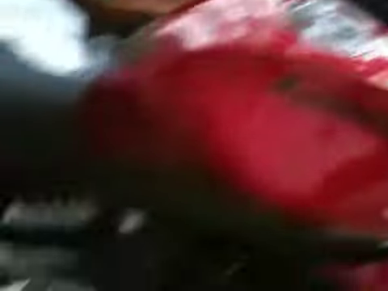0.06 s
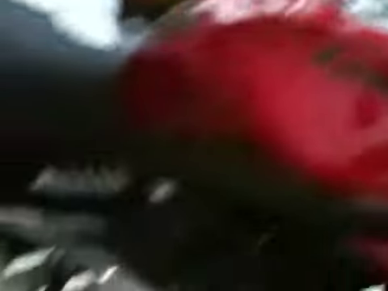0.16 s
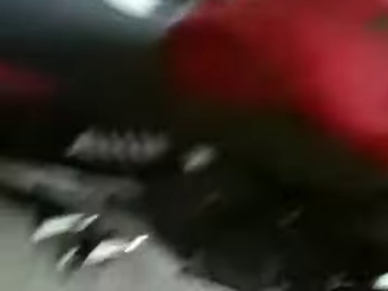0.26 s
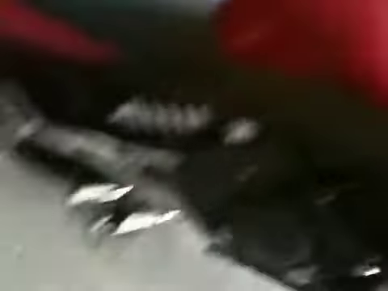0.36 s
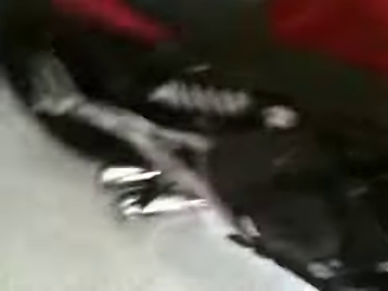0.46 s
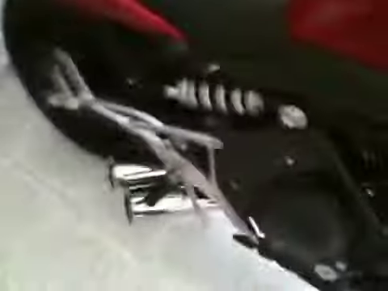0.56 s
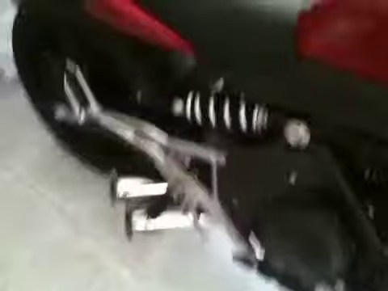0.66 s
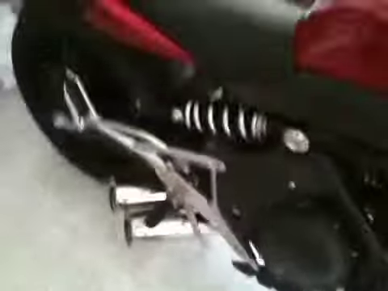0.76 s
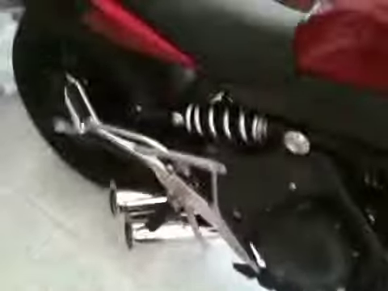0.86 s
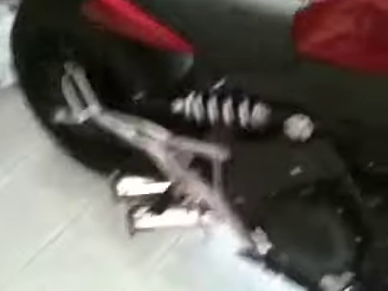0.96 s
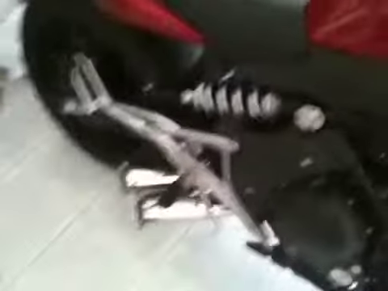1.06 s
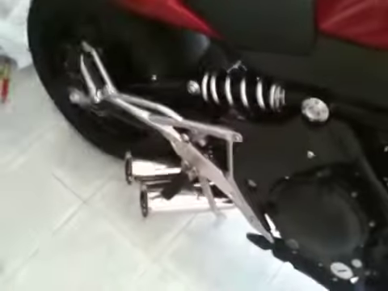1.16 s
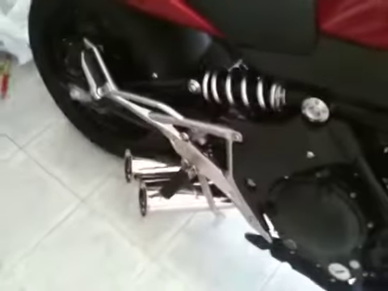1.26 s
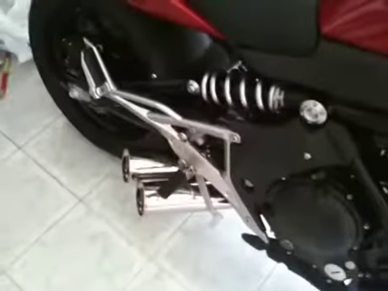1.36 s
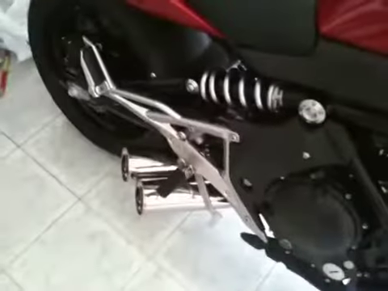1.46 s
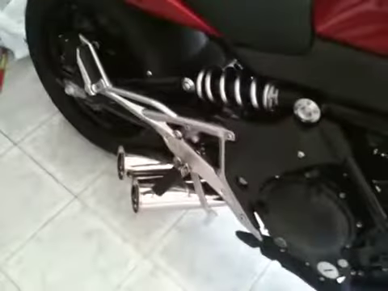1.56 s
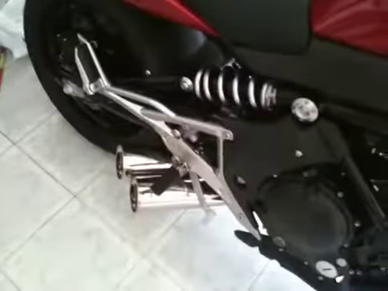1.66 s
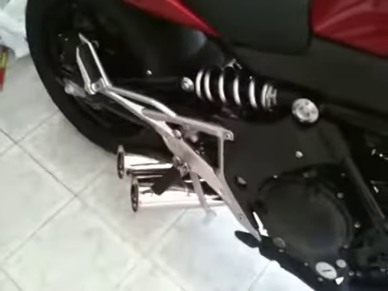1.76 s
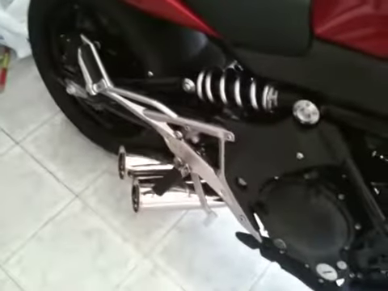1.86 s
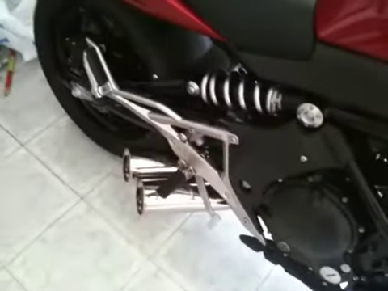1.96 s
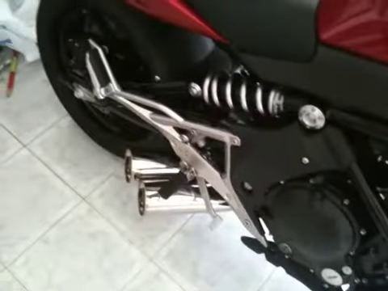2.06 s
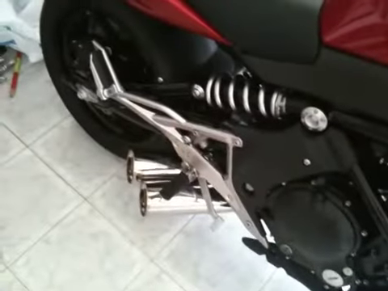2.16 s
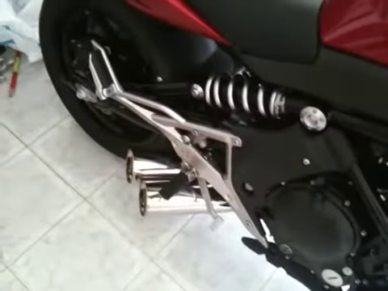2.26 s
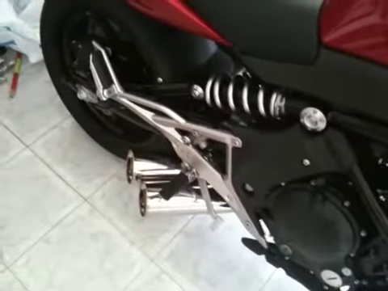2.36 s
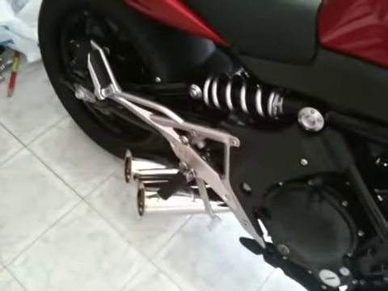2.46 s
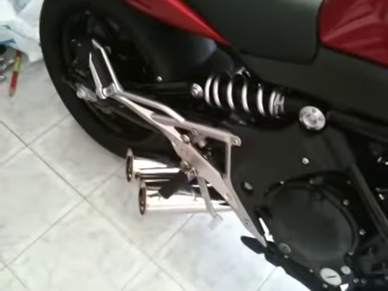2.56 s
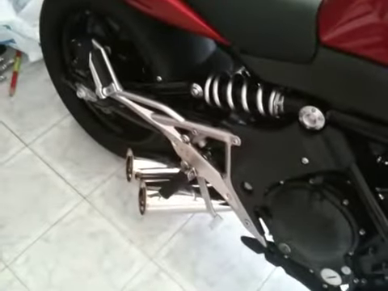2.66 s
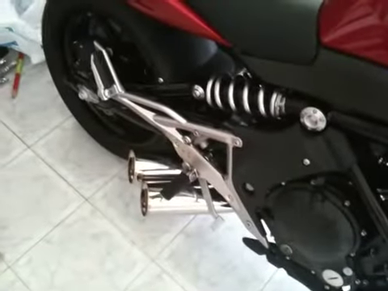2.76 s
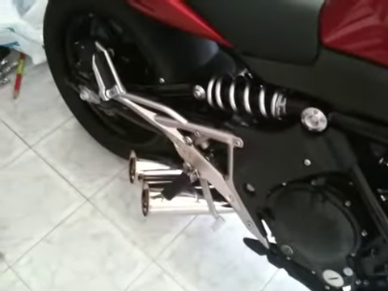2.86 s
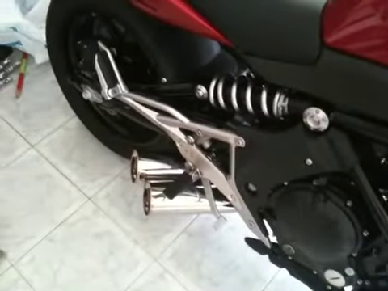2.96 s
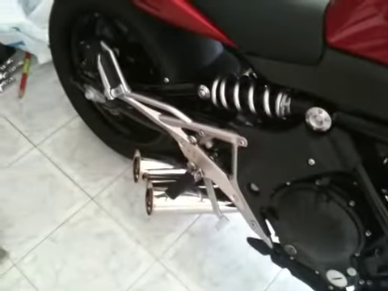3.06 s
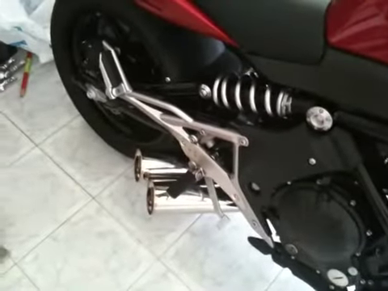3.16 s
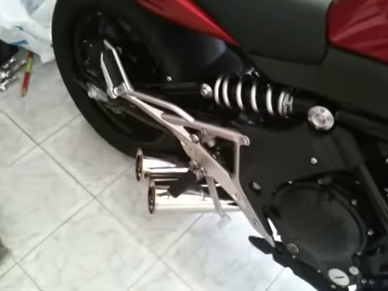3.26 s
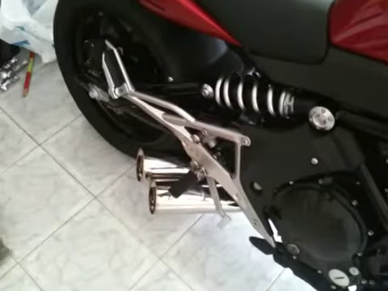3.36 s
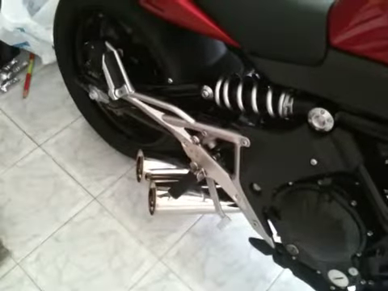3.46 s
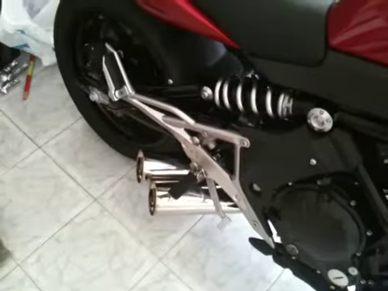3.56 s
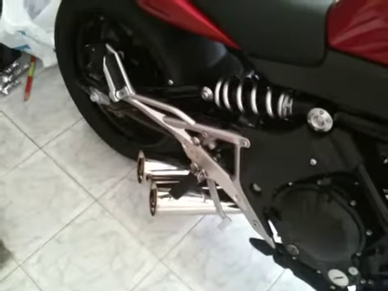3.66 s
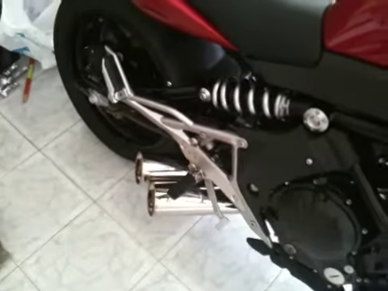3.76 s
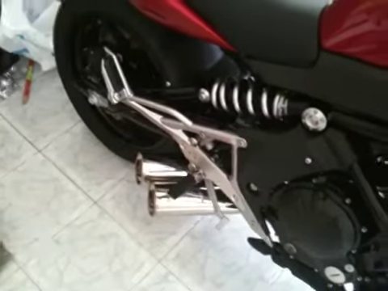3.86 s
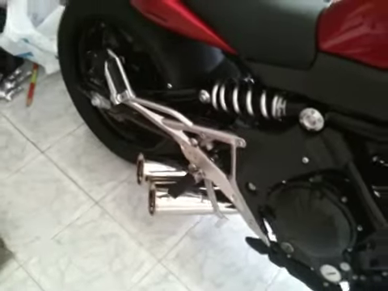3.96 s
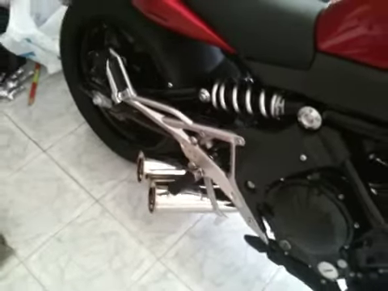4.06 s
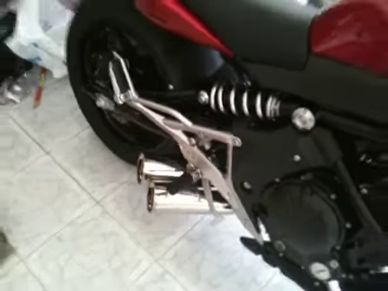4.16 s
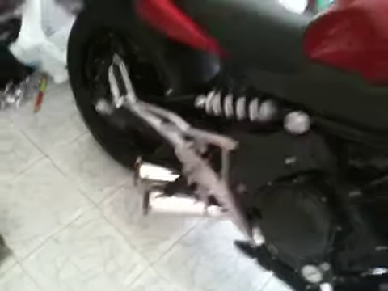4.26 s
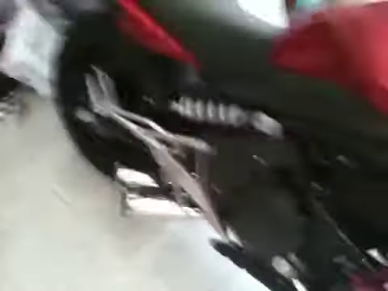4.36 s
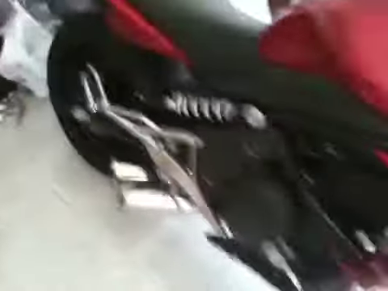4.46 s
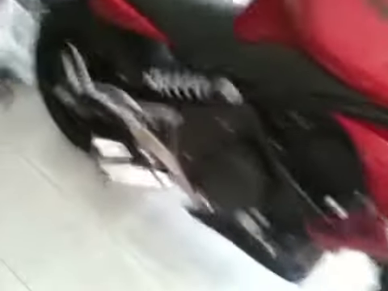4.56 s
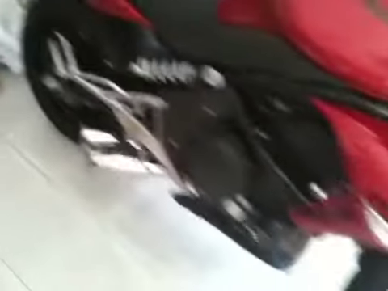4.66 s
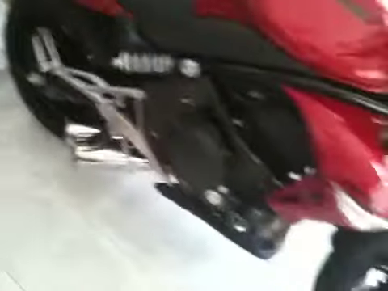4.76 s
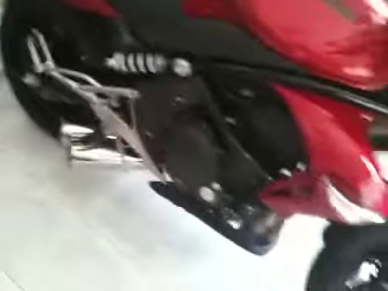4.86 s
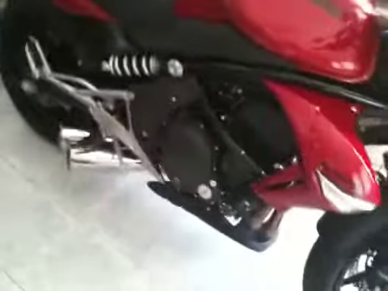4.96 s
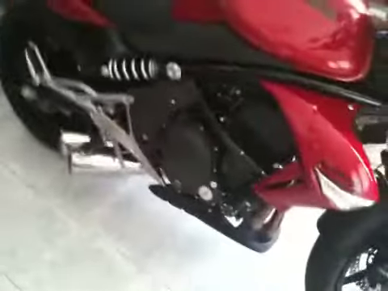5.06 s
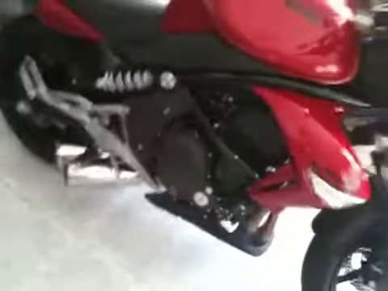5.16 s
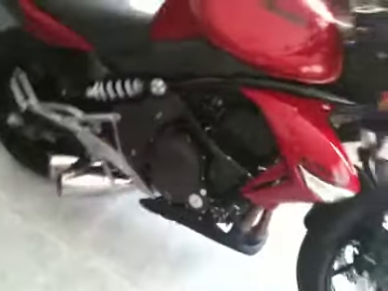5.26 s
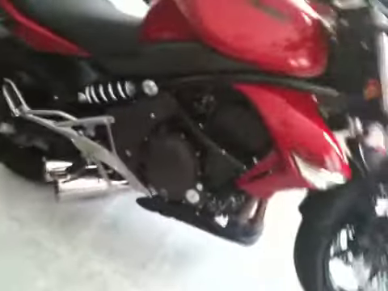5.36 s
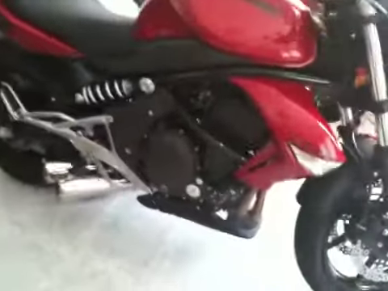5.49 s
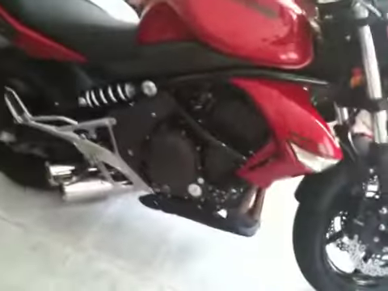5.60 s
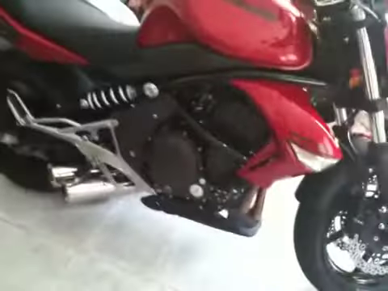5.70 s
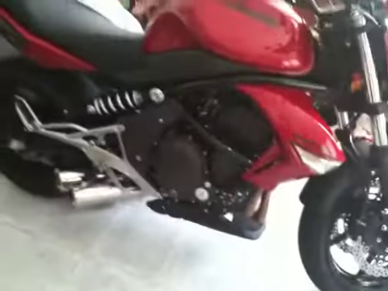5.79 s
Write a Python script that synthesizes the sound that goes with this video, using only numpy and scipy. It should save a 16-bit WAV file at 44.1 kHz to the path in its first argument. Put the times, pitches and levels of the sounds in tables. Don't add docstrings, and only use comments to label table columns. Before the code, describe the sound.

In a small tiled room, soles shuffle very quietly with small taps, a faint key ring and rubber squeaks for two seconds. A starter then clacks, grinds and squeals for about half a second. The two-cylinder motorcycle catches unevenly and idles loudly, its throbbing exhaust overloading the close microphone, which shifts place partway through.

```python
import sys
import numpy as np
from scipy import signal
from scipy.fft import rfft, irfft, next_fast_len
from scipy.io import wavfile
from scipy.ndimage import uniform_filter1d

SR = 44100
rng = np.random.default_rng(int(sys.argv[2]) if len(sys.argv) > 2 else 0)


def volts_from_db(level):
    exponent = np.asarray(level, float) / 20
    return 10 ** exponent


def output_pcm(signal):
    pcm = np.clip(np.atleast_2d(signal).T, -1, 1) * 32767
    wavfile.write(sys.argv[1], SR, np.round(pcm).astype(np.int16))


N = 257103

# (start [s], end [s])
MIC_MOVE = (3.95, 4.72)
# (time [s], strength [dB])
CATCHING = [(2.344, -0.5), (2.367, 6), (2.453, -1), (2.474, -11), (2.556, -10), (2.577, -20), (2.635, 1.5),
            (2.658, 0), (2.675, -1), (2.726, 5.5), (2.746, -0.5), (2.808, 2.5), (2.828, 3.5), (2.885, 4),
            (2.902, 4.5)]


def firings():
    cycle = np.arange(idle_cycles())
    second_lag = .241
    pair = np.c_[cycle, cycle + second_lag].ravel()
    at = crank(pair)
    chance = rng.standard_normal((len(pair), 3))
    second = np.arange(len(pair)) % 2
    blow_db = 1.93 + 2.3 * second + 1.0 * chance[:, 0]
    crack_db = np.interp(at, MIC_MOVE, (0.3, 2)) - 5.9 * second + 0.9 * chance[:, 1]
    catch_s, catch_db = np.transpose(CATCHING)
    all_s = np.r_[catch_s, at + .00025 * chance[:, 2]]
    return all_s, np.r_[catch_db, blow_db], np.r_[catch_db - 3.0, crack_db]


IDLE_START_S = 2.9568
IDLE_SPEED = [(2, 1647.2), (2, 1696.1), (2, 1658.6), (2, 1704.5), (2, 1744.2), (4, 1729.1), (2, 1750.5),
              (8, 1766.0), (8, 1774.5), (6, 1697.3), (4, 1750.5)]


def crank(cycles):
    held, rpm = np.transpose(IDLE_SPEED)
    cycles_done = np.r_[0, np.cumsum(held)]
    seconds_gone = np.r_[0, np.cumsum(held * 2 * 60 / rpm)]
    return IDLE_START_S + np.interp(cycles, cycles_done, seconds_gone)


def idle_cycles():
    return sum(held for held, _ in IDLE_SPEED)


# (pitch [Hz], width [Hz], pressure at the first mic place [1/1000], at the second [1/1000])
ROOM_NOTES = [(114.2, 10.1, 332, 219), (145.76, 7.2, 524, 587), (173.33, 7.8, 412, 293),
              (186.3, 5.8, 345, 165.9), (215.46, 1.73, 230, 245), (242.35, 6.5, 280, 364),
              (249.56, 7.1, 23, 411), (275, 10.7, 537, -56.5), (301.3, 3.04, -132.9, -71),
              (325.1, 2.9, -150.5, -117), (361.8, 7.6, 274, 149), (411.6, 4.15, -52, -76),
              (471.4, 3.4, -30, -24), (483.6, 8.7, -11, 47), (556, 4.1, 26, -23), (605, 3.6, 26, -41),
              (676, 120, -185.6, -53)]


def exhaust(s, blow_db):
    u = np.arange(400) / SR / 0.00043
    blow = (1 - u) * np.exp(-u) / (.0005 * SR)
    t = np.arange(SR // 2) / SR
    hz, width, *places = np.transpose(ROOM_NOTES)
    fading = np.exp(-np.pi * np.outer(t, 1.03 * width))
    rings = fading * np.sin(2 * np.pi * np.outer(t, hz))
    moved = np.clip((s - MIC_MOVE[0]) / (MIC_MOVE[1] - MIC_MOVE[0]), 0, 1)
    out = 4.2 * clicks(s, volts_from_db(blow_db))
    for share, pressure in zip((1 - moved, moved), places):
        train = clicks(s, share * volts_from_db(blow_db))
        out = out + signal.fftconvolve(train, rings @ pressure / 1000)[:N]
    out = signal.lfilter(*signal.butter(2, 1500, fs=SR), out)
    return signal.oaconvolve(out, blow)[:N]


# (time [s], pitch [Hz], level [dB])
PIPE_END = [
    (2.3, 592, -19),
    (2.9, 630, -14.5),
    (3.4, 618, -14.5),
    (3.75, 700, -13.5),
    (4.2, 790, -22),
    (5.0, 634, -38),
    (5.83, 624, -31),
]


def snaps(s, blow_db):
    _, hz, level_db = follow(PIPE_END)
    width = 75
    ring = resonate(clicks(s + .0008, volts_from_db(blow_db)), hz, width) * SR / (2 * np.pi * width)
    return -volts_from_db(level_db) * ring


# (time [s], peak level [dB])
EXTRA_POPS = [(2.368, -4.5), (2.7283, -15.5), (2.8087, -11), (2.9553, -27), (3.029, -13), (3.1724, -31),
              (3.3147, -35), (3.4585, -10), (3.5318, -9), (3.6691, -7), (3.8064, -42), (3.8748, -8.5),
              (4.6949, -10.5), (4.895, -13)]
# (pitch [Hz], width [Hz], level at the first mic place [dB], level at the second [dB])
PIPE_RINGS = [(1150, 85, 5.5, 2), (1555, 270, -8, 10.5), (2380, 150, 5, 16), (3500, 420, 1, -6)]
# (frequency [Hz], level per Hz [dB])
CRACK_COLOUR = [(260, 0), (450, 1.5), (993, -10), (1530, -13), (1950, -12), (2360, -18.5), (2660, -18),
                (4230, -31.5), (8800, -31.5), (15100, -41.5), (16000, -48)]


def cracks(s, crack_db):
    pop_s, pop_db = np.transpose(EXTRA_POPS)
    train = clicks(s + .0025, volts_from_db(crack_db)) + clicks(pop_s + 0.001068, volts_from_db(pop_db + 9.5))
    jet = volts_from_db(18.5) * train + puffs(train, 0.027)
    t = np.arange(N) / SR
    rings = np.zeros(N)
    for hz, width, *place_db in PIPE_RINGS:
        rings = rings + volts_from_db(np.interp(t, MIC_MOVE, place_db)) * resonate(jet, hz, width)
    echo = tiles(jet + 0.39 * rings, t60=0.31)
    echo = signal.lfilter(*signal.butter(1, 800, "high", fs=SR), echo)
    return volts_from_db(-24.5) * evened(colour(1.22 * jet + rings + volts_from_db(4.0) * echo, CRACK_COLOUR))


# (frequency [Hz], level per Hz [dB])
VALVE_COLOUR = [(260, -9), (450, -3.5), (979, -17), (1170, -14.5), (2400, -24), (4430, -28.5), (8930, -31),
                (11500, -37.5), (16000, -48)]
# (pitch [Hz], width [Hz], level at the first mic place [dB], level at the second [dB])
COVER_RING = (3340, 706, -23, -19)


def valve_gear(s, blow_db):
    effort = signal.lfilter([1], [1, -volts_from_db(-60 / 0.81 / SR)], clicks(s, volts_from_db(blow_db)))
    effort = abs(uniform_filter1d(effort, size=400) / np.median(effort[N // 2:])) ** 0.63
    count = np.arange(-60, 8 * idle_cycles())
    at = crank(count / 8) + np.minimum(count, 0) * .0105
    once_a_cycle = np.cos(2 * np.pi * (count / 8 - .08))
    tick_db = 4.3 * rng.standard_normal(len(at)) + 2.7 * once_a_cycle
    ticks = evened(puffs(clicks(at, volts_from_db(tick_db)), 0.038))
    ticks = signal.lfilter(*signal.butter(1, 9000, fs=SR), ticks)
    hiss = rng.standard_normal(N)
    gear = evened(colour(hiss + volts_from_db(-3.0) * ticks, VALVE_COLOUR))
    hz, width, *cover_db = COVER_RING
    cover_gain = volts_from_db(np.interp(np.arange(N) / SR, MIC_MOVE, cover_db))
    gear = gear + cover_gain * evened(resonate(gear, hz, width))
    return effort * volts_from_db(-30 + 8.0) * gear


# (time [s], rise [s], level [dB], fall [dB/s])
STARTER_LOADS = [
    (1.914, 0.013, -29.5, 60),
    (2.058, .008, -27.5, 140),
    (2.269, 0.011, -24, 124),
    (2.385, 0.0063, -33, 170),
]
# (frequency [Hz], level per Hz [dB])
GRIND_COLOUR = [(240, -15), (400, -15.5), (636, -10.5), (697, -3.5), (964, -9.5), (1420, -2), (1630, -5),
                (2020, -4), (5350, -11.5), (8370, -11), (16000, -25.5)]
# (pitch [Hz], width [Hz], level [dB])
CASING_RINGS = [(8200, 33, -17), (8558, 48, -15), (7100, 200, -28), (1140, 110, -10.5)]
# (time [s], rise [s], level [dB], fall [dB/s])
FRAME_SHAKE = (2.078, .025, -38.5, 42)
# (time [s], length [s], from pitch [Hz], to pitch [Hz], level [dB])
GEAR_SQUEALS = [
    (1.928, 0.084, 1150, 1480, -33.5),
    (2.065, .045, 1420, 950, -22.5),
    (2.269, 0.047, 1524, 1183, -24.5),
    (2.391, 0.057, 1640, 1513, -33),
]
# (time [s], length [s], from pitch [Hz], to pitch [Hz], level [dB])
GEAR_WHISTLE = (1.965, .06, 3700, 3630, -34)
# (time [s], level [dB], pitch [Hz], 60 dB fade [s])
SWITCH_CLACK = (1.9155, -25, 4750, .05)


def starter():
    on_s, off_s = 1.915, 2.49
    grind = swell(on_s, 0.0016, -37.5, 150, hold=off_s - on_s)
    grind = grind + sum(swell(*row) for row in STARTER_LOADS)
    teeth = evened(colour(rng.standard_normal(N), GRIND_COLOUR))
    strain = (grind / volts_from_db(-22.5)) ** .6
    casing = sum(volts_from_db(db) * evened(resonate(teeth, hz, width)) for hz, width, db in CASING_RINGS)
    teeth = teeth + strain * casing
    shake = evened(resonate(resonate(rng.standard_normal(N), 95, 80), 115, 94))
    out = grind * volts_from_db(-4.0) * teeth + swell(*FRAME_SHAKE) * shake
    for row in GEAR_SQUEALS:
        out = out + tone(glide(*row, in_db=2.5, out_db=-8.5), overtone_db=0.0, wobble=.04)
    out = out + tone(glide(*GEAR_WHISTLE, in_db=-15, out_db=-17), wobble=0.0056)
    s, level_db, hz, t60 = SWITCH_CLACK
    clack = puffs(clicks([s], [volts_from_db(level_db)]), t60)
    out = out + volts_from_db(-18) * signal.lfilter(*signal.butter(2, 9000, fs=SR), clack)
    out = out + volts_from_db(11.5) * resonate(clack, hz, 400)
    return out + volts_from_db(-6) * tiles(out)


# (time [s], rise [s], level [dB], share of the hollow ring [ratio])
SOLE_STEPS = [
    (.334, 0.066, -58, .27),
    (.615, 0.087, -56, 0.83),
    (1.035, 0.068, -57.5, .25),
    (1.215, .025, -62.5, .3),
    (1.57, 0.099, -52.5, 0.76),
    (1.69, 0.024, -57, 0.3),
]
# (frequency [Hz], level [dB])
SCRAPE_COLOUR = [(400, -9.5), (700, -5), (1200, -5.5), (1800, -6.5), (2400, -15), (4000, -27), (9000, -38)]


def shuffling():
    scrape = evened(colour(rng.standard_normal(N), SCRAPE_COLOUR))
    ring = evened(resonate(scrape, 850, 22))
    soles = swell(SOLE_STEPS[0][0], .05, -77.5, 0) * scrape
    for s, rise, db, hollow in SOLE_STEPS:
        soles = soles + swell(s, rise, db, fall=114) * (scrape + hollow * ring)
    return soles


# (time [s], peak level [dB], 60 dB fade [s])
SMALL_TAPS = [
    (0.3641, -42, 0.097),
    (0.384, -36, 0.1),
    (1.08, -37.5, 0.22),
    (1.2351, -46.5, 0.46),
    (1.702, -35.5, 0.1),
]


def tapping():
    taps = sum(puffs(clicks([s], [volts_from_db(db - 11.0)]), t60) for s, db, t60 in SMALL_TAPS)
    taps = signal.lfilter(*signal.butter(2, [1800, 8000], "band", fs=SR), taps)
    return taps + volts_from_db(8.0) * resonate(taps, 2660, 260)


# (pitch [Hz], level [dB])
KEY_NOTES = [(5082, -81), (6083, -85), (6982, -85)]


def key_ring():
    t = np.maximum(np.arange(N) / SR - .71, 0)
    fade_db = -60 * t / 0.99
    return sum(volts_from_db(db + 15.0 + fade_db) * np.sin(2 * np.pi * hz * t) for hz, db in KEY_NOTES)


# (time [s], length [s], from pitch [Hz], to pitch [Hz], level [dB])
RUBBER_SQUEAKS = [
    (.08, .12, 2950, 2680, -78),
    (.53, 0.091, 4100, 2850, -75),
    (.93, .13, 3500, 3370, -72),
    (1.54, .14, 3410, 3360, -74),
]


def squeaking():
    return sum(tone(glide(*row, in_db=-5, out_db=-5.5), wobble=.004) for row in RUBBER_SQUEAKS)


# (pitch [Hz], width [Hz], level [dB])
FLOOR_NOTES = [(112, 18, -12.5), (157, 52, -4), (199, 15, 5), (260, 17, 5.5), (447, 20, -11.5),
               (484, 3.4, 4)]
# (time [s], rise [s], hold [s], level [dB])
WEIGHT_SHIFTS = [
    (.02, 0.17, 0.25, -62.5),
    (0.507, 0.12, .005, -60),
    (1.005, 0.034, .01, -60),
    (1.125, .016, 0.18, -64),
    (1.42, 0.17, .08, -60),
    (1.68, 0.13, .01, -64),
    (2.092, 0.068, .3, -50),
]
# (time [s], length [s], from pitch [Hz], to pitch [Hz], level [dB])
DRONES = [
    (0, 0.54, 486, 488, -69),
    (0.144, .45, 268, 265, -73),
    (.72, 0.54, 212, 208.3, -60.5),
    (1.384, .32, 201.4, 204.5, -57),
    (1.45, 0.2, 262, 263, -69),
    (1.85, 0.18, 205, 219, -44.5),
    (1.915, 0.19, 300, 288, -48),
]


def floor_hum():
    noise = rng.standard_normal(N)
    hum = sum(volts_from_db(db) * resonate(resonate(noise, hz, width), hz, width) for hz, width, db in FLOOR_NOTES)
    level = volts_from_db(-68)
    for s, rise, hold, db in WEIGHT_SHIFTS:
        level = level + swell(s, rise, db, 450, hold)
    drones = sum(tone(glide(*row, in_db=-5, out_db=-4), wobble=.015) for row in DRONES)
    return evened(hum) * level + drones


# (frequency [Hz], level [dB])
AIR_COLOUR = [(24, -63), (40, -36), (140, 0), (209, -3.5), (372, -11), (630, -13.5), (697, -21), (831, -16),
              (1550, -25), (2910, -23), (4240, -26), (7360, -24), (16000, -40)]


def still_air():
    air = volts_from_db(-66.5 + 4.5) * evened(colour(rng.standard_normal(N), AIR_COLOUR))
    return air + volts_from_db(-84) * np.sin(2 * np.pi * 15700 * np.arange(N) / SR)


def tiles(x, t60=0.29, treble_t60=0.24):
    t, noise = np.arange(SR // 2) / SR, rng.standard_normal(SR // 2)
    low = signal.lfilter(*signal.butter(1, 2500, fs=SR), noise)
    tail = low * volts_from_db(-60 * t / t60) + (noise - low) * volts_from_db(-60 * t / treble_t60)
    tail = tail * (t > .006)
    return signal.fftconvolve(x, tail / np.linalg.norm(tail))[:N]


def evened(x):
    return x / np.sqrt(np.mean(x ** 2) + 1e-20)


def follow(rows):
    s, *columns = np.transpose(rows)
    t = np.arange(N) / SR
    alive = uniform_filter1d(1. * ((t >= s[0]) & (t <= s[-1])), size=90)
    return [alive] + [np.interp(t, s, c) for c in columns]


def colour(x, points):
    f, level_db = np.transpose(points)
    size = next_fast_len(N + 4096)
    hz = np.fft.rfftfreq(size, 1 / SR)
    gain = volts_from_db(np.interp(np.log(hz + 1), np.log(f + 1), level_db))
    return irfft(rfft(x, size) * gain, size)[:N]


def resonate(x, hz, width):
    turn = np.exp(2j * np.pi * np.cumsum(hz * np.ones(N)) / SR)
    r = np.exp(-np.pi * width / SR)
    return 2 * (turn * signal.lfilter([1 - r], [1, -r], x / turn)).real


def clicks(s, size):
    at = np.round(np.asarray(s) * SR).astype(int)
    return np.bincount(at[at < N], np.asarray(size)[at < N], N)


def puffs(train, t60):
    return signal.lfilter([1], [1, -volts_from_db(-60 / t60 / SR)], train) * rng.standard_normal(N)


def tone(rows, overtone_db=-60, wobble=.02):
    alive, hz, level_db = follow(rows)
    unsteady = evened(uniform_filter1d(rng.standard_normal((2, N)), size=150, axis=1))
    turn = 2 * np.pi * np.cumsum(hz * (1 + wobble * unsteady[0])) / SR
    loudness = alive * (1 + 0.38 * unsteady[1]) * volts_from_db(level_db)
    return loudness * (np.sin(turn) + volts_from_db(overtone_db) * np.sin(2 * turn))


def swell(s, rise, level_db, fall, hold=0):
    t = np.arange(N) / SR - s
    return np.clip(t / rise, 0, 1) * volts_from_db(level_db - fall * np.maximum(t - rise - hold, 0))


def glide(s, length, from_hz, to_hz, level_db, in_db, out_db):
    at, done = np.array([0, .25, .55, 1]), np.array([0, .38, .75, 1])
    hz = from_hz + (to_hz - from_hz) * done
    return np.c_[s + length * at, hz, level_db + np.array([in_db, 0, -1.5, out_db])]


def scene():
    s, blow_db, crack_db = firings()
    engine = exhaust(s, blow_db) + snaps(s, blow_db) + cracks(s, crack_db) + valve_gear(s, blow_db)
    person = shuffling() + tapping() + key_ring() + squeaking()
    return (engine + starter() + person + floor_hum() + still_air())[None]


def band_limit(x):
    return signal.sosfilt(signal.butter(12, 15930, fs=SR, output="sos"), x)


def record(dry):
    x = signal.lfilter(*signal.butter(2, 110, "high", fs=SR), dry)
    ceiling, knee = .72, 4.0
    x = x / (1 + abs(x / ceiling) ** knee) ** (1 / knee)
    x = signal.lfilter(*signal.butter(3, 72, "high", fs=SR), x)
    x = np.clip(x, -.715, .715)
    treble_limit = signal.firwin(301, 15850, window=("kaiser", 8), fs=SR)
    x = signal.oaconvolve(x, treble_limit[None], "same")
    return band_limit(x)


dry = scene()
out = record(dry)
output_pcm(out)
```